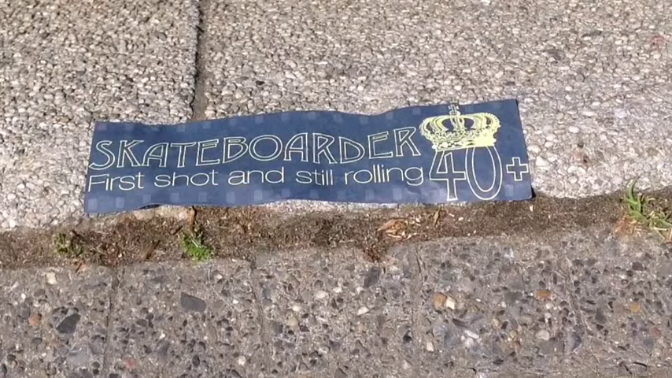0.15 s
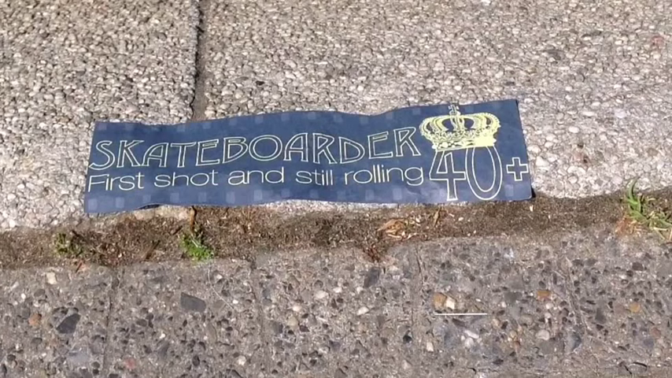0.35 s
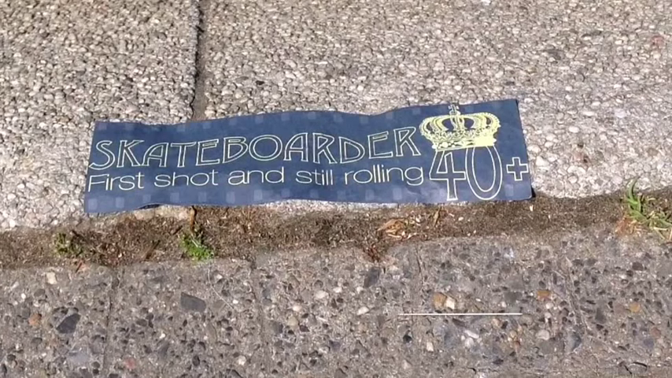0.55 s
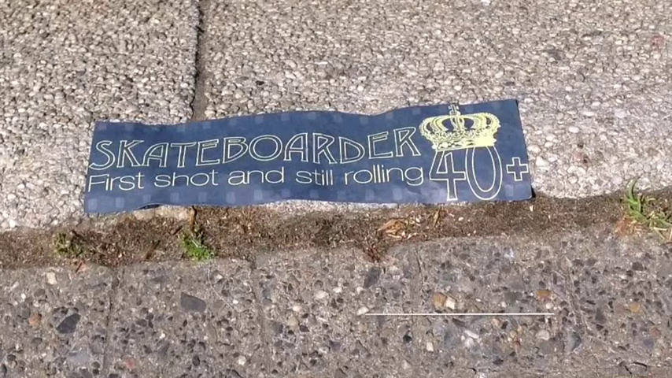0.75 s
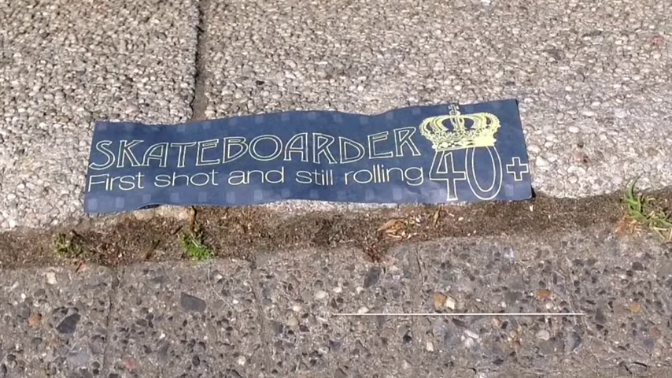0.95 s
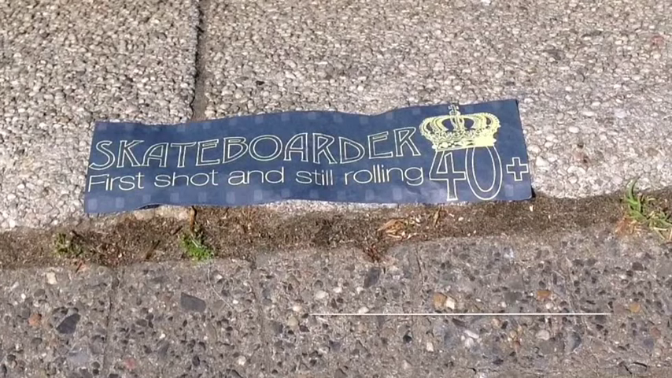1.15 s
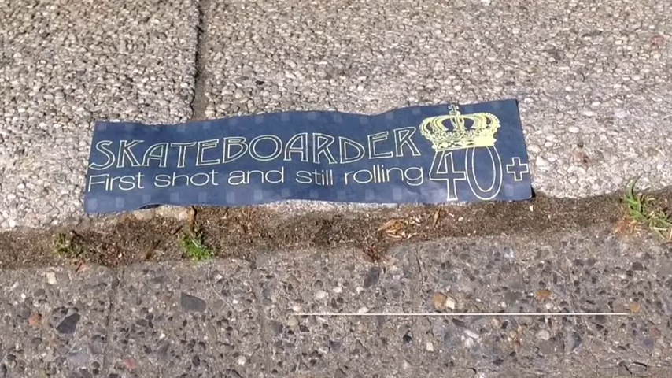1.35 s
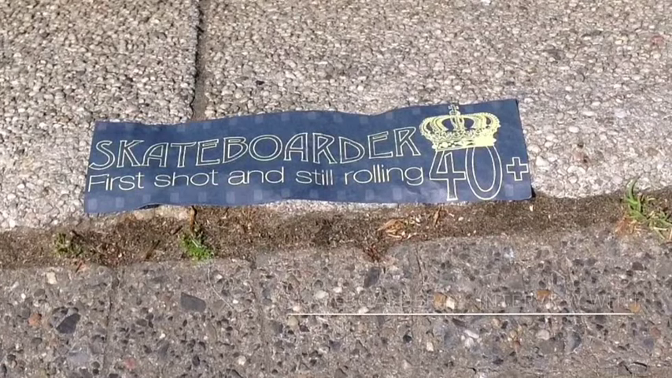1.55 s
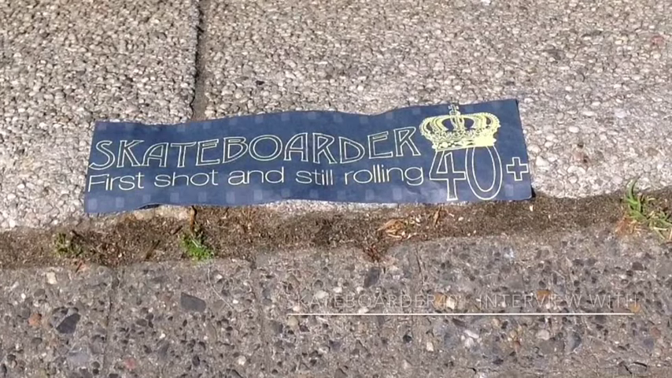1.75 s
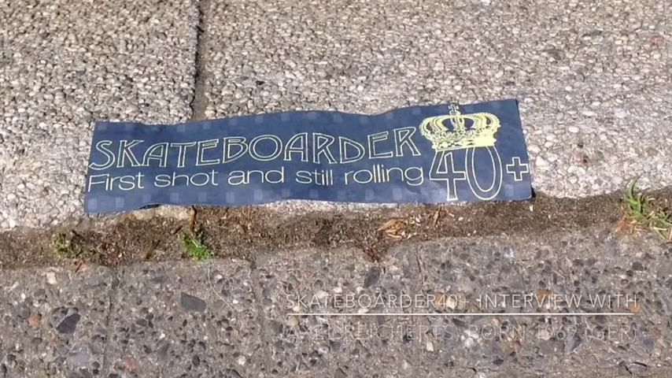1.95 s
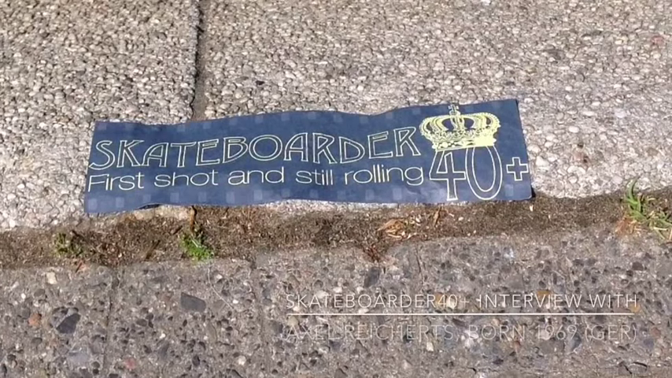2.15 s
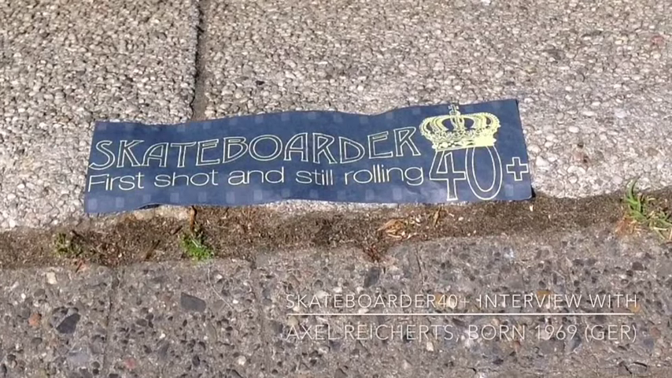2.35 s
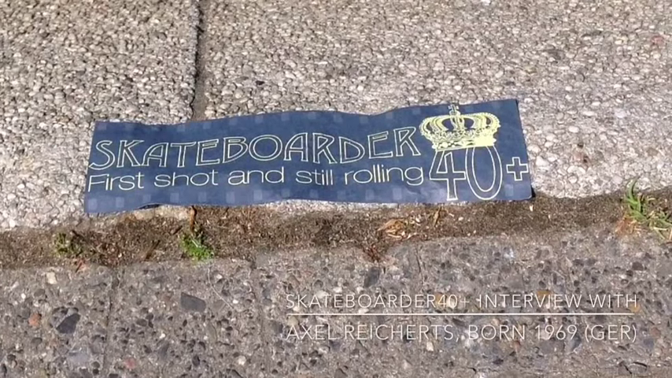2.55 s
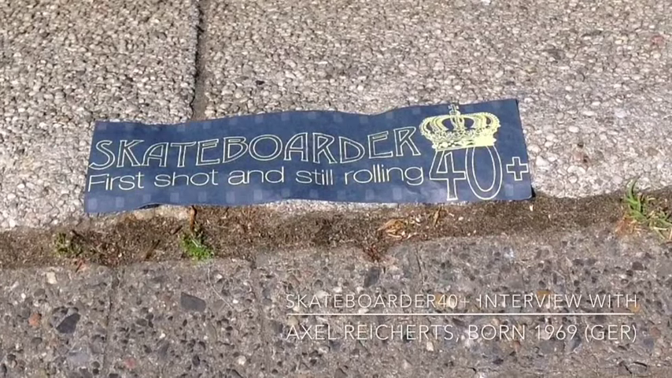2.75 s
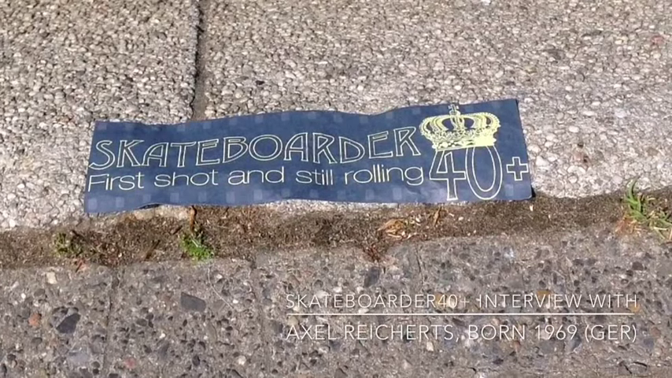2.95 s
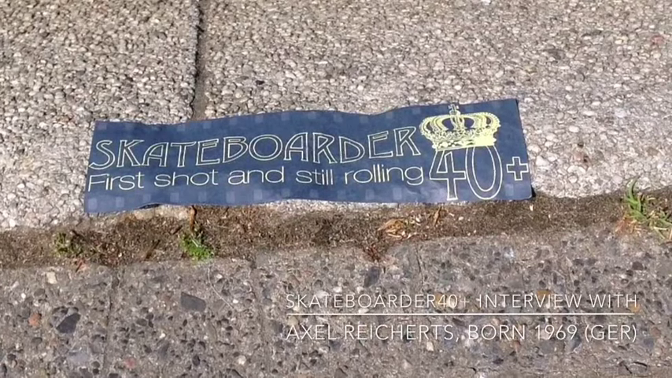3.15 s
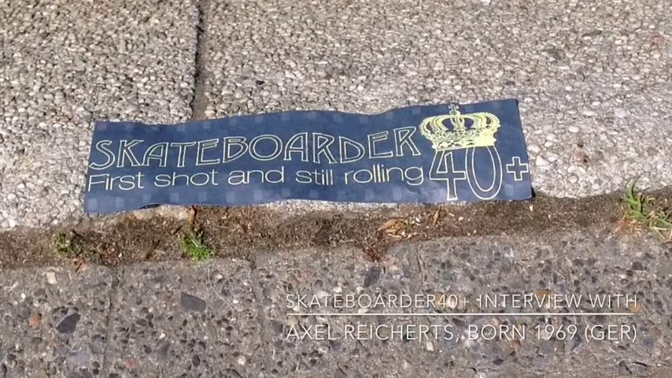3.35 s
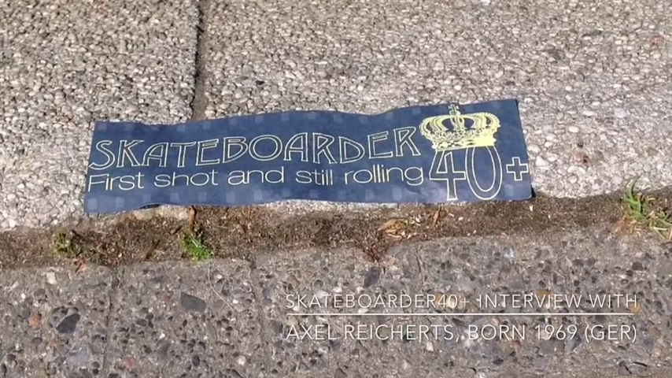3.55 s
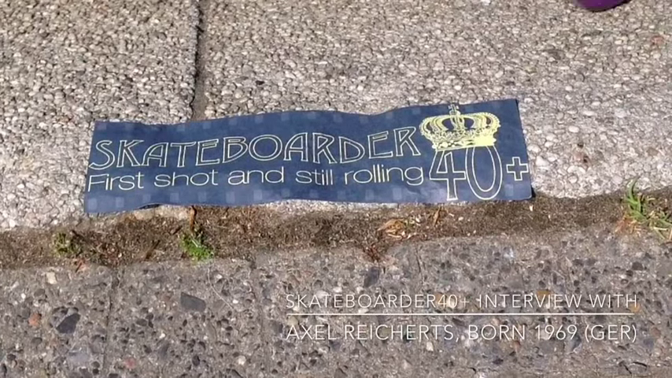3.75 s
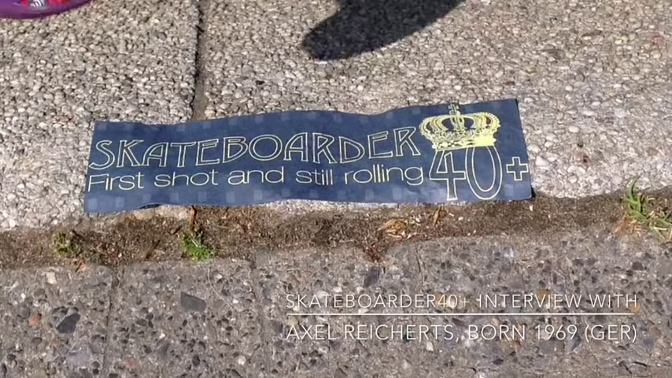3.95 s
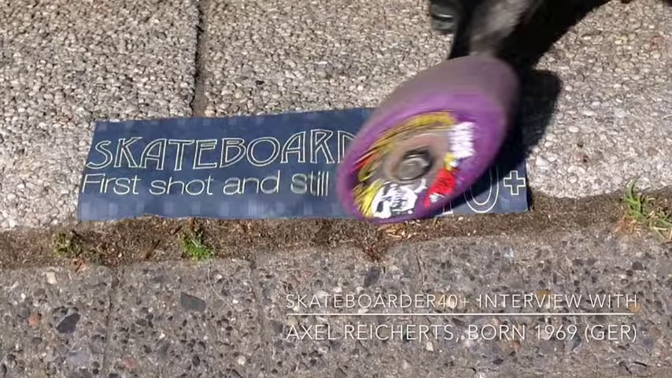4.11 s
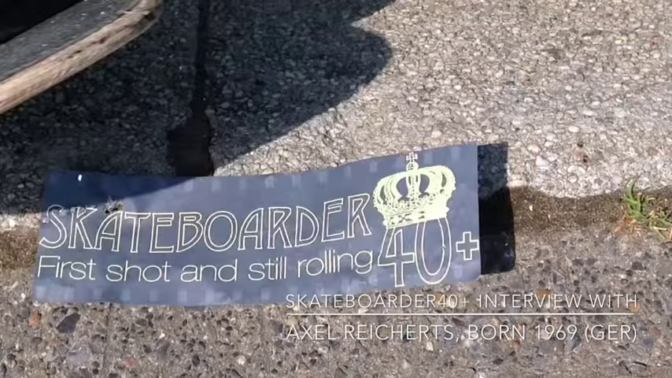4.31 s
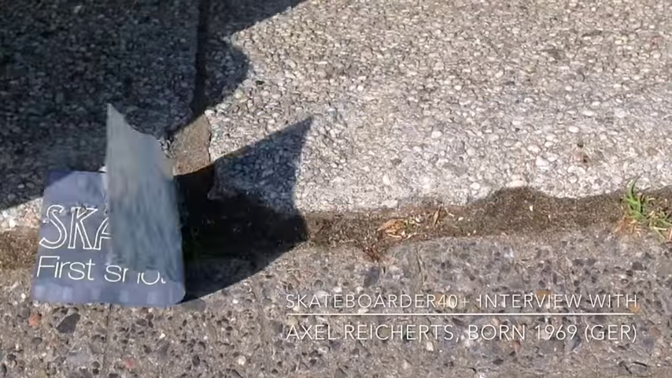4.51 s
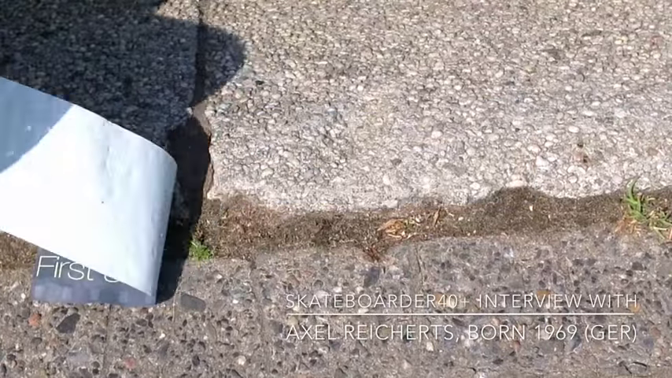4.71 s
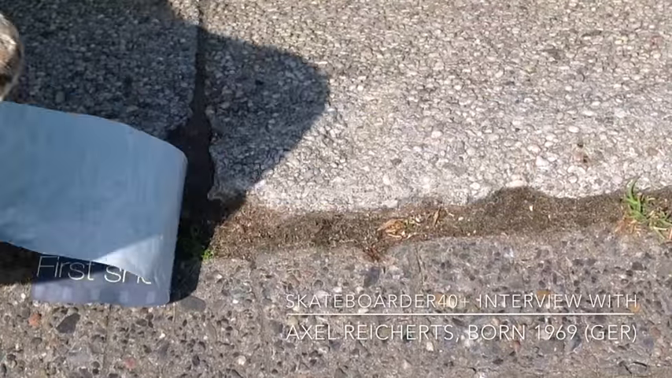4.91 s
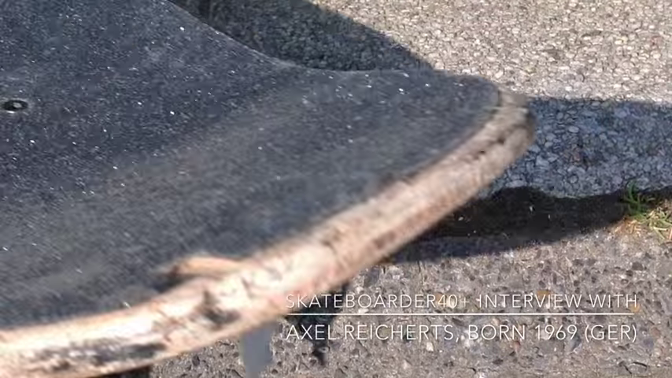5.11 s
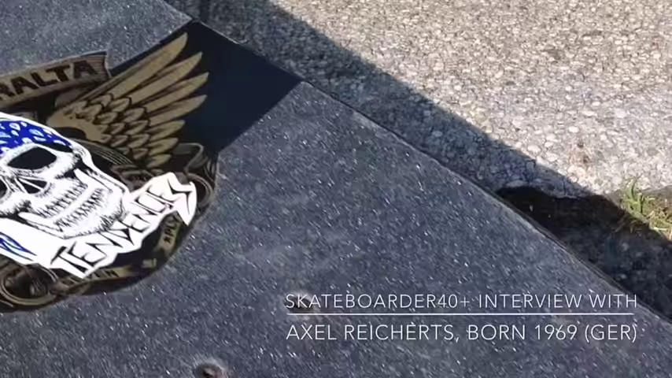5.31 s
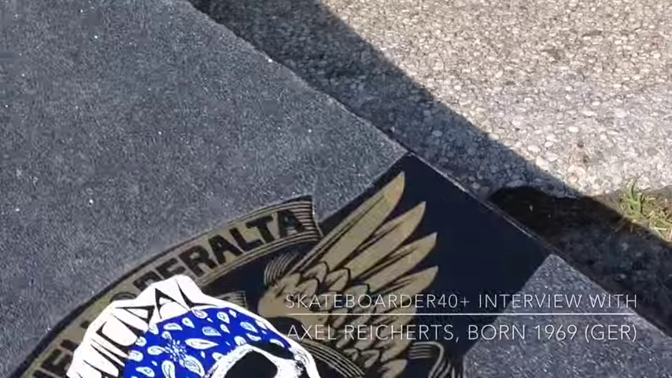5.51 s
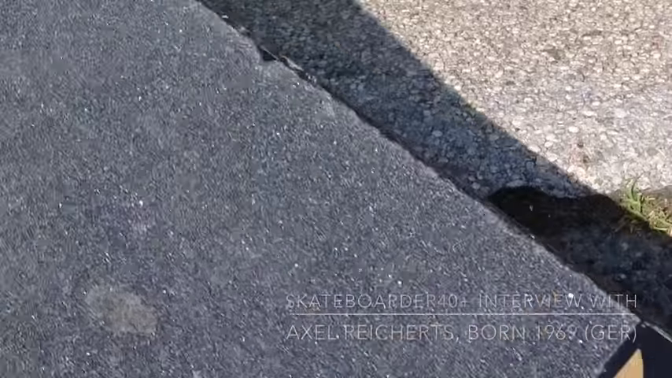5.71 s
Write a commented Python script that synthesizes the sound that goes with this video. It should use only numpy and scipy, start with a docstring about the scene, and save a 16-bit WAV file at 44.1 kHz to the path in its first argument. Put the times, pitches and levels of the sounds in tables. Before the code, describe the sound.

A skateboard rumbles closer over rough concrete, clacking at joints, swells into a distorted scraping stop, then is dragged and knocked past the microphone.

```python
"""A skateboard rolls nearer over rough concrete slabs, scrapes, stops short and is dragged past a small microphone.
Bumps in the paving jolt it: filtered noise makes the wheels rumble, the deck growl, the trucks scrape, grit crackle.
Rough patches make growl and grit surge over the steady roll. Hardware clacks are ticks, short tones and ringing noise
bursts; squeaks are sliding sines; deck knocks are soft thumps with decaying modes.
The microphone on the ground keeps nothing above its band limit and limits and overloads on the loudest jolts."""
import sys
import numpy as np
from scipy import signal
from scipy.fft import rfft, irfft, next_fast_len
from scipy.io import wavfile
from scipy.ndimage import uniform_filter1d, minimum_filter1d, map_coordinates

SR = 44100
rng = np.random.default_rng(int(sys.argv[2]) if len(sys.argv) > 2 else 0)


def pcm_store(signal):
    """Save signal as 16-bit PCM."""
    levels = np.round(np.clip(np.atleast_2d(signal), -1, 1) * 32767)
    wavfile.write(sys.argv[1], SR, levels.astype(np.int16).T)


def nominal_scale(level):
    """Amplitude ratio for a level in decibels (scalar or array-like)."""
    x = np.asarray(level, float) / 20
    return 10 ** x


N = 258866  # length in samples


def unit(x):
    """Scaled to rms 1."""
    return x / np.sqrt(np.mean(x ** 2) + 1e-20)


def wobble(rate):
    """A smooth random curve, rate knots a second."""
    knots = rng.standard_normal(int(N * rate / SR) + 4)
    return map_coordinates(knots, [np.arange(N) * rate / SR])


def curves(rows):
    """One value per sample for each column after the time."""
    s, *cols = np.transpose(rows)
    return [np.interp(np.arange(N) / SR, s, c) for c in cols]


def filtered(x, response):
    """x times a complex response of frequency."""
    m = next_fast_len(N + SR // 2)
    spectrum = rfft(x, m) * response(np.fft.rfftfreq(m, 1 / SR))
    return irfft(spectrum, m)[..., :N]


def body(modes):
    """Causal response of a set of resonances, neighbours in opposite polarity."""
    def response(f):
        total = 0
        for k, (hz, width, db) in enumerate(modes):
            total = total + (-1) ** k * nominal_scale(db) * 1j * f * width / (hz * hz - f * f + 1j * f * width)
        return total
    return response


def jolts(rate, spread_db, life):
    """Envelope of random contacts: sudden start, fade over life seconds, a few much bigger than the rest; rms 1."""
    chance = rng.random(N)
    size = np.minimum(rng.exponential(size=N), 4.5)
    hits = (chance < rate / SR) * nominal_scale(spread_db * size)
    return unit(signal.lfilter([1], [1, -np.exp(-1 / (life * SR))], hits))


def reach(mode_hz, centre_hz, octave_db):
    """Modes far from the driven centre get less, by octave_db at one octave and four times that at two."""
    return nominal_scale(-octave_db * np.log2(mode_hz / centre_hz) ** 2)


def driven(shake, modes, centre_hz, octave_db):
    """A shaking force into a set of steep-sided modes, shared out unevenly around a moving centre; rms near 1 throughout."""
    rings = np.array([unit(filtered(shake, lambda f: body([mode])(f) ** 2)) for mode in modes])
    shares = np.array([nominal_scale(db + 3.03 * wobble(8)) * reach(hz, centre_hz, octave_db) for hz, _, db in modes])
    return np.sum(rings * shares, axis=0) / np.sqrt(np.sum(shares ** 2, axis=0))


def dull(f):
    """Rubber and wood pass little treble: a steep causal roll-off."""
    corner_hz = 1090
    return 1 / (1 + 1.2j * f / corner_hz - (f / corner_hz) ** 2) ** 2


def hum(hz):
    """A narrow band of noise whose centre glides; rms 1."""
    corner_hz = 26.3
    slow = filtered(rng.standard_normal((2, N)), lambda f: 1 / (1 + 2j * f / corner_hz) ** 2)
    turn = 2 * np.pi * np.cumsum(hz) / SR
    return unit(slow[0] * np.cos(turn) + slow[1] * np.sin(turn))


# wheels bouncing on their rubber: mode_hz, width_hz (one resonance), level_db (relative)
WHEEL_MODES = [(110.6, 72, 0.5), (149.8, 103, 2), (220.2, 57, -1)]


def wheel_rumble(bumps, detail, wheel_hz):
    """Bumps shake the wheel modes through the rubber; the loaded wheel hums, and the roll surges unevenly."""
    shake = filtered((1.8 + detail * bumps) * rng.standard_normal(N), dull)
    broad = driven(shake, WHEEL_MODES, wheel_hz, octave_db=7)
    hum_db = -6  # against the broad rumble
    return unit(broad + nominal_scale(hum_db) * hum(wheel_hz)) * nominal_scale(1.68 * wobble(11))


# bending modes of the deck: mode_hz, width_hz (one resonance), level_db (relative)
DECK_MODES = [(310, 130, 1.5), (401.8, 161, 3.5), (479.3, 142, 2), (572.7, 158, 3.5), (681, 150, 4),
              (778.5, 119, -1), (845, 260, -4)]


def deck_growl(bumps, detail, deck_hz):
    """The same bumps, dulled by rubber and wood, shake the deck modes around a moving centre."""
    shake = filtered((1.27 + detail * bumps) * rng.standard_normal(N), dull)
    return driven(shake, DECK_MODES, deck_hz, octave_db=20)


# truck resonances, squared when played: mode_hz, width_hz (before squaring), level_db (before squaring)
TRUCK_MODES = [(1000, 970, 4.5), (1816, 700, 2)]


def truck_scrape(bumps, detail):
    """Undulled bump noise rings the metal trucks; rms 1."""
    shake = (0.64 + detail * bumps) * rng.standard_normal(N)
    return unit(filtered(shake, lambda f: body(TRUCK_MODES)(f) ** 2))


# colour of the grit hiss: pitch_hz, level_db (relative)
GRIT_COLOUR = [(1000, 8), (1700, -14), (2330, -7.5), (2840, 1.5), (4330, 6), (7700, 5)]
# metal axle hardware: mode_hz, width_hz, level_db (relative)
HARDWARE_MODES = [(1987, 580, 7.5), (2940, 560, 11), (4195, 990, 7), (5830, 980, 5), (7320, 1000, 3)]


def grit_crackle(bumps, detail, bright):
    """Fine grains crackle under the wheels: coloured hiss, and a rattle of metal parts."""
    grains = jolts(500, spread_db=5.5, life=0.0011)
    crackle = 0.7 + detail * (0.35 * bumps + 0.9 * grains)
    hz, db = np.transpose(GRIT_COLOUR)
    colour = lambda f: nominal_scale(np.interp(np.log(f + 1), np.log(hz), db))
    hiss = filtered(crackle * rng.standard_normal(N), colour)
    noise, rattle = rng.standard_normal(N), np.zeros(N)
    for k, mode in enumerate(HARDWARE_MODES):  # grit rings now one metal part, now another
        taps = 0.74 * detail * jolts(120, spread_db=3.5, life=0.003)
        rattle += (-1) ** k * nominal_scale(1.2 * wobble(21.962)) * filtered((crackle + taps) * noise, body([mode]))
    return (bright * unit(hiss) + 2.446 * unit(rattle)) / np.hypot(bright, 2.1)


# the steady roll: time_s, rumble_db, growl_db, grit_db
ROLL_LEVELS = [(.09, -39, -30.5, -42), (.6, -30, -31.5, -46), (.93, -31.5, -33.5, -48.5),
               (1.27, -29.5, -28.5, -44), (1.66, -32.5, -26, -37), (1.81, -31, -28.5, -48),
               (2.3, -29.5, -27, -44.5), (2.71, -28, -29, -45.5), (3.15, -24.5, -24.5, -37),
               (3.42, -18, -18.5, -31), (3.56, -17.5, -17, -30.5), (3.72, -10.5, -20.5, -29),
               (3.84, -16, -12.5, -20), (3.92, -10, -21.5, -24), (4.1, -13.5, -14, -20.5),
               (4.18, -27.5, -13, -11.5), (4.3, -14.5, -8, -13), (4.46, -15, -14, -20),
               (4.5, -29, -25, -34.5), (4.72, -31.5, -24, -37.5), (4.89, -35.5, -29, -28.5),
               (5.19, -25.5, -34.5, -31), (5.33, -26, -14.5, -29.5), (5.52, -24.5, -18, -33.5),
               (5.87, -22, -17, -32.5)]
# where the load sits: time_s, wheel_hz and deck_hz (centres of the modes driven best), scrape_db (over grit)
LOAD_SHIFTS = [(.09, 208.8, 460, -2.5), (.33, 211.3, 466, -4), (.5, 213, 600, -7.5), (.85, 226.3, 440, 0),
               (1.8, 205.6, 404, -8), (3.2, 186.6, 422, -1.5), (3.8, 190.7, 565, -4.5),
               (3.88, 145, 353, -10), (4.1, 105.9, 352, -8), (4.24, 176.1, 650, -9.5),
               (4.39, 176.6, 586, 1), (4.52, 204, 690, 6), (4.88, 204, 667, -7), (5.25, 215, 478, -9),
               (5.55, 248, 338, 5.5), (5.87, 258, 367, -3)]


def rolling():
    """Paving texture shakes wheels, deck and trucks through shared bumps; grit adds fine crackle."""
    rumble_db, *steady_db = curves(ROLL_LEVELS)
    growl_gain, grit_gain = np.sqrt(nominal_scale(2 * np.array(steady_db)) + patches())
    wheel_hz, deck_hz, scrape_db = curves(LOAD_SHIFTS)
    bumps = jolts(110, spread_db=3.5, life=0.0089)
    # nearer and harder contact hisses more: 0.66 dB of hiss over rattle per dB of grit above the middle level
    middle_db = -35.5
    bright = (grit_gain / nominal_scale(middle_db)) ** 0.66
    detail = bright / (1 + bright)  # far off, the single bumps and grains blur together
    rumble = wheel_rumble(bumps, detail, wheel_hz)
    growl = deck_growl(bumps, detail, deck_hz)
    grit = grit_crackle(bumps, detail, bright) + nominal_scale(scrape_db) * truck_scrape(bumps, detail)
    return nominal_scale(rumble_db) * rumble + growl_gain * growl + grit_gain * grit


# clacks of stones and slab joints in the axle hardware: start_s, level_db, pitch_hz (strongest mode)
CLACK_HITS = [(0.099, -22, 2420), (1.4306, -17, 4850), (1.467, -21, 3953), (1.5178, -18, 4340),
              (1.696, -7.5, 2510), (1.7012, -12.5, 4850), (1.728, -11, 2850), (2.974, -18, 6050),
              (3.176, -14, 1960), (3.3267, -15, 2870), (3.4016, -11.5, 3110), (3.46, -4.5, 3190),
              (3.545, -12, 3060), (3.6313, -8.5, 3940), (3.663, -13, 2890), (3.694, -6.5, 2820),
              (3.7765, -4.5, 3000), (3.798, -5.5, 4370), (3.8426, -0.5, 2970), (4.097, -10.5, 3510),
              (4.1334, 0.5, 3250), (4.149, 8.5, 2790), (4.2255, -4.5, 1160), (4.418, -2.5, 1890),
              (4.4416, -11, 1040), (4.572, -17, 1510), (4.609, -11.5, 4370), (5.3946, 3, 3980),
              (5.482, -7, 3080), (5.538, -8.5, 3850), (5.573, -15, 3200), (5.713, -9.5, 4240),
              (5.762, -18, 5060), (5.8257, -5, 4290)]


def clacks():
    """A sharp tick, a short tone at its own pitch and a dying burst favouring the hardware modes near that pitch."""
    ring_db, ring_cycles = -7, 20  # the tone's level and the cycles it takes to fall 60 dB
    t = np.arange(SR // 10) / SR
    bursts, tones = np.zeros((len(HARDWARE_MODES), N + SR)), np.zeros(N + SR)
    # a tick that falls 60 dB in 12 ms over a burst that takes 39 ms
    shape = nominal_scale(-10.5 - 60 * t / 0.012) + nominal_scale(-10.5 - 60 * t / 0.039)
    mode_hz = np.array(HARDWARE_MODES)[:, :1]
    for s, db, pitch_hz in CLACK_HITS:
        start = round(s * SR)
        noise = rng.standard_normal(len(t))
        mode_gain = nominal_scale(db + 1.2 * rng.standard_normal(mode_hz.shape)) * reach(mode_hz, pitch_hz, 2.5)
        bursts[:, start:start + len(t)] += mode_gain * shape * noise
        fade = nominal_scale(db + ring_db - 60 * t * pitch_hz / ring_cycles)
        tones[start:start + len(t)] += fade * np.sin(2 * np.pi * pitch_hz * t)
    out = tones[:N]
    for k, mode in enumerate(HARDWARE_MODES):
        out = out + (-1) ** k * filtered(bursts[k, :N], body([mode]))
    return out


# rough patches of paving: full_s (time at full strength), held_s, growl_db, grit_db
ROUGH_PATCHES = [(0.326, 0.13, -14, -26), (0.402, 0.051, -16, -22.5), (1.448, 0.02, -22, -35),
                 (1.7, 0.039, -20, -34), (3.459, 0.045, -24, -26.5), (3.671, 0.028, -9.5, -20.5),
                 (3.839, 0.072, -19, -20), (4.269, 0.066, -6, -19.5), (4.771, 0.094, -33.5, -33),
                 (4.961, 0.032, -12.5, -22.5), (5.017, 0.024, -11.5, -28), (5.079, 0.044, -10, -20.5),
                 (5.161, 0.011, -10, -19.5), (5.214, 0.041, -15.5, -31), (5.426, 0.02, -12, -27),
                 (5.568, 0.018, -8.5, -27.5), (5.64, 0.019, -14, -34), (5.711, 0.012, -11, -32)]


def patches():
    """Growl and grit power of rough paving: steady dB swell, hold, steady fade; long patches change more gently."""
    rise_db_per_s, fall_db_per_s = 1190, 419.5  # for the briefest patch
    long_s = 0.055  # a patch held this long takes twice as long to swell and fade
    t, power = np.arange(N) / SR, np.zeros((2, N))
    for s, held, growl_db, grit_db in ROUGH_PATCHES:
        swell_db = rise_db_per_s * (s - t)
        fade_db = fall_db_per_s * (t - s - held)
        down_db = np.maximum(0, np.maximum(swell_db, fade_db)) / (1 + held / long_s)
        power += nominal_scale(2 * np.array([[growl_db], [grit_db]])) * nominal_scale(-2 * down_db)
    return power


# brief squeaks: time_s, pitch_hz, level_db
SQUEAK_GLIDES = [(.63, 690, -76), (.645, 722, -24), (.665, 836, -36), (.705, 817, -30), (.74, 806, -66),
                 (4.75, 1320, -72), (4.77, 1340, -31), (4.86, 1340, -35), (4.89, 1320, -73)]


def squeak():
    """Short sine tones that slide, unsteady in pitch and level."""
    hz, db = curves(SQUEAK_GLIDES)
    phase = 2 * np.pi * np.cumsum(hz + 25 * wobble(91)) / SR
    return nominal_scale(db + 3.3 * wobble(47.0)) * np.sin(phase)


# knocks of the deck: start_s, level_db, pitch_hz (strongest mode)
KNOCK_HITS = [(1.078, -28.5, 256), (1.703, -11.5, 404), (1.727, -8.5, 500), (3.177, -11.5, 240),
              (3.477, -0.5, 206), (3.671, -7.5, 161.5), (3.776, -0.5, 148), (4.572, -12, 844),
              (4.611, -8.5, 690), (4.616, -18, 112), (4.955, -17, 600), (4.976, -0.5, 537),
              (5.017, -4.5, 425), (5.044, -10.5, 730), (5.074, -5.5, 500), (5.097, -0.5, 512),
              (5.107, 0, 502), (5.158, -2, 297), (5.212, -9, 446), (5.309, -13, 587), (5.369, -9.5, 322),
              (5.427, -12, 388), (5.541, -1.5, 333), (5.57, -9, 304), (5.607, 1, 353), (5.703, -11.5, 416),
              (5.714, -5, 310), (5.8229, 4, 576), (5.828, 0, 330)]


def knocks():
    """A soft blow thumps at its own pitch and rings deck and wheel modes near it, at new strengths and phases."""
    thump_db, thump_cycles = -1.5, 10.1  # the thump holds, then dies ever faster: 60 dB down after these cycles
    t = np.arange(SR // 8) / SR
    out = np.zeros(N + SR)
    hz, width, db = np.transpose(WHEEL_MODES + DECK_MODES)[:, :, None]
    soft = (1 - np.exp(-t / 0.00088)) ** 2  # gentle onset
    for s, level_db, pitch_hz in KNOCK_HITS:
        start = round(s * SR)
        size, turn = rng.random((2, len(hz), 1))
        strength = nominal_scale(db + 0.89 * size) * reach(hz, pitch_hz, 5.2) / hz
        decay = np.exp(-0.45 * np.pi * width * t)
        rings = strength * decay * np.sin(2 * np.pi * (hz * t + 0.3 * turn))
        ring = np.gradient(rings.sum(axis=0) * soft)  # the air feels the rate of motion
        fade = nominal_scale(thump_db - 60 * (t * pitch_hz / thump_cycles) ** 2)
        thump = soft * fade * np.sin(2 * np.pi * pitch_hz * t)
        out[start:start + len(t)] += nominal_scale(level_db - 1) * (0.4 * ring / np.abs(ring).max() + thump)
    return out[:N]


def scene():
    """All sounds of the board."""
    return (rolling() + clacks() + squeak() + knocks())[None]


def roll_off(x):
    """The treble ends steeply here."""
    return signal.sosfilt(signal.butter(12, 8530, fs=SR, output="sos"), x)


def record(dry):
    """Microphone: bass cut, band limit, a late start, a fast limiter and hard overload of what slips past it."""
    low_hz, top_hz, start_s = 79, 7644, 0.0615
    bass = lambda f: (1j * f / low_hz) ** 2 / (1 + 1.4j * f / low_hz - (f / low_hz) ** 2)
    x = filtered(dry, lambda f: bass(f) * (f < top_hz))
    x = x * (np.arange(N) > start_s * SR)
    needed = 1 / np.maximum(1, np.abs(x) / 1.13)  # gain that would hold each sample to 1.13
    x = x * uniform_filter1d(minimum_filter1d(needed, size=301), size=331)
    x = np.clip(x, -0.995, 0.995)
    return roll_off(x)


dry = scene()
out = record(dry)
pcm_store(out)
```